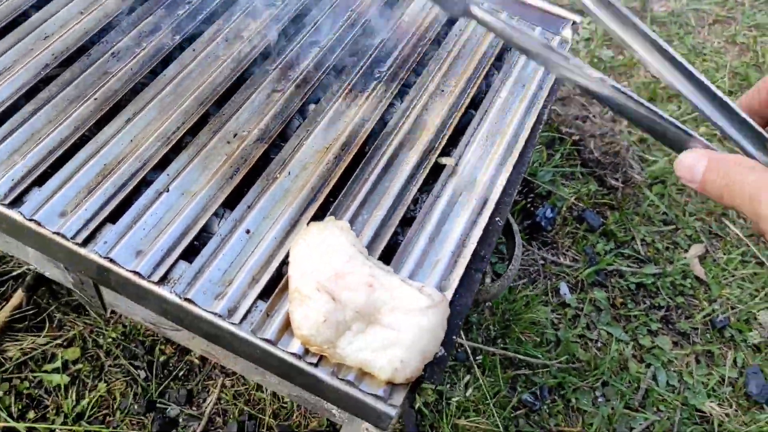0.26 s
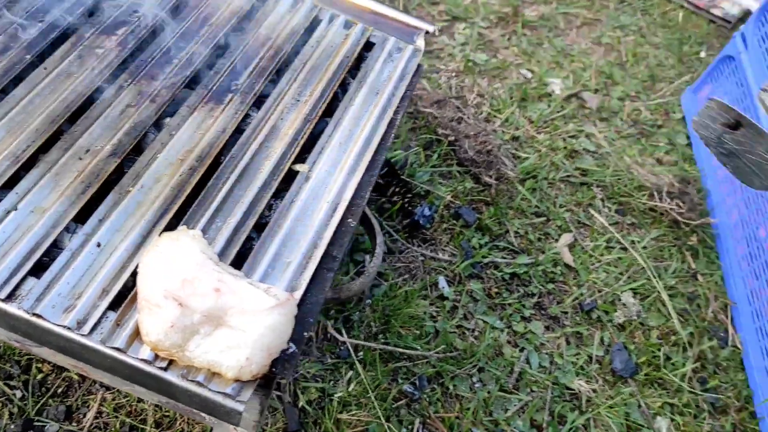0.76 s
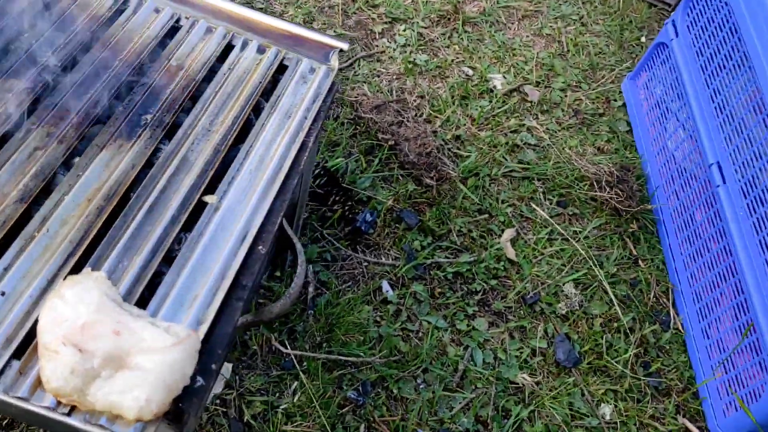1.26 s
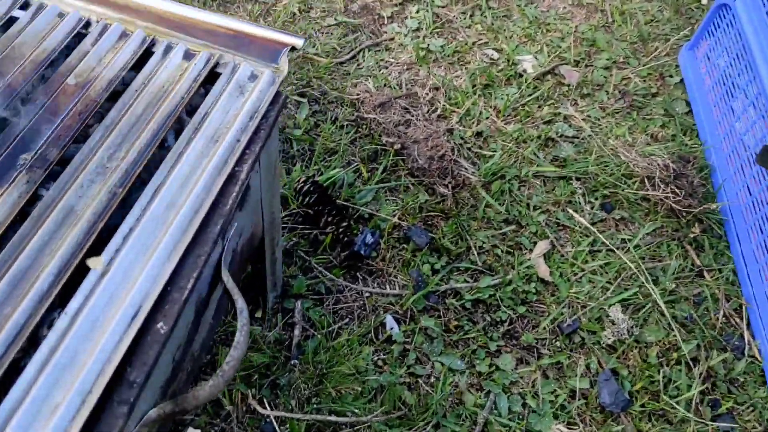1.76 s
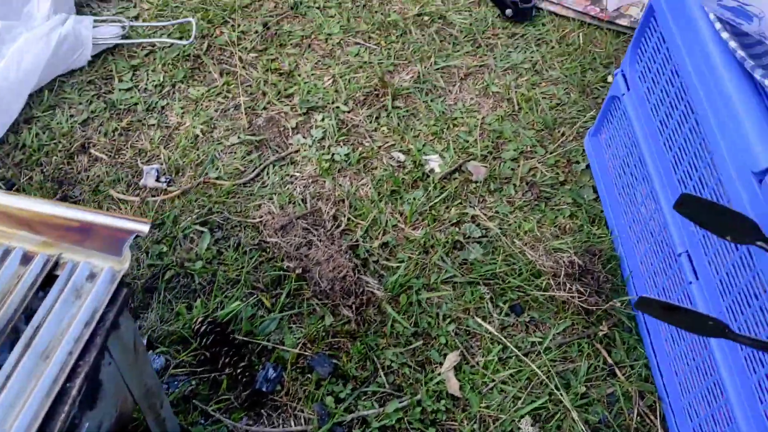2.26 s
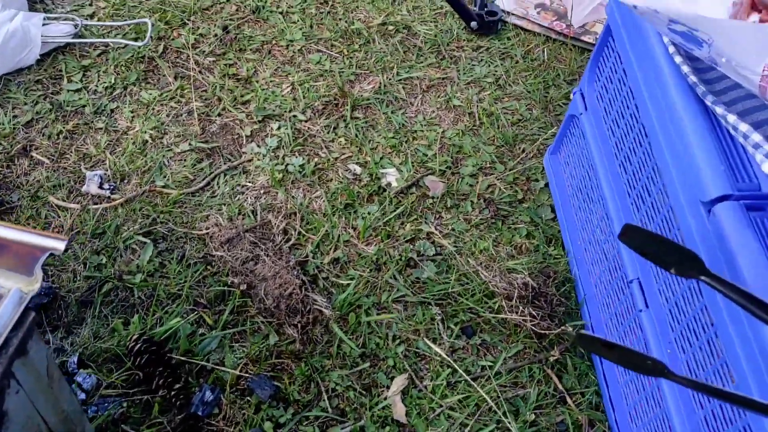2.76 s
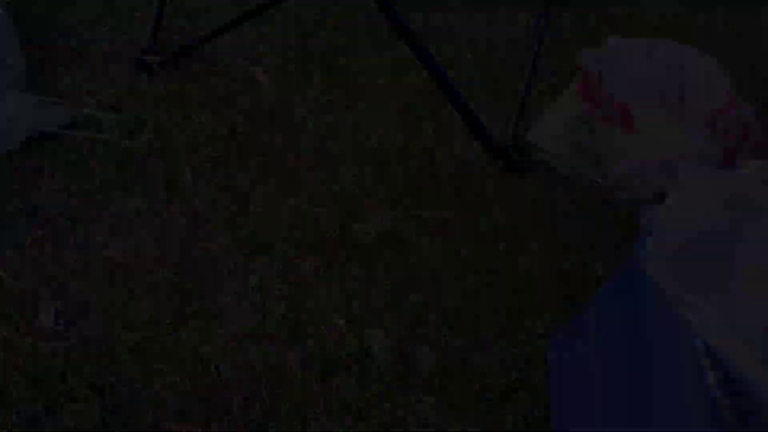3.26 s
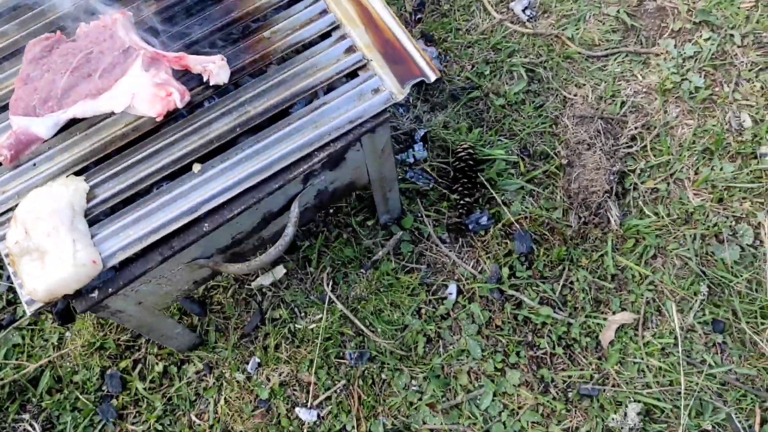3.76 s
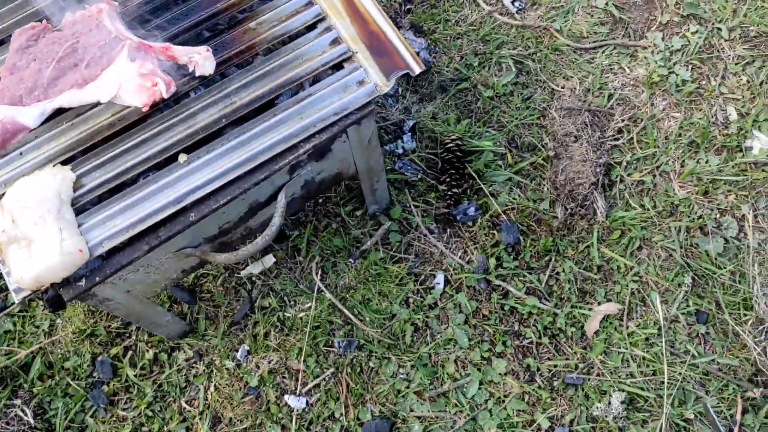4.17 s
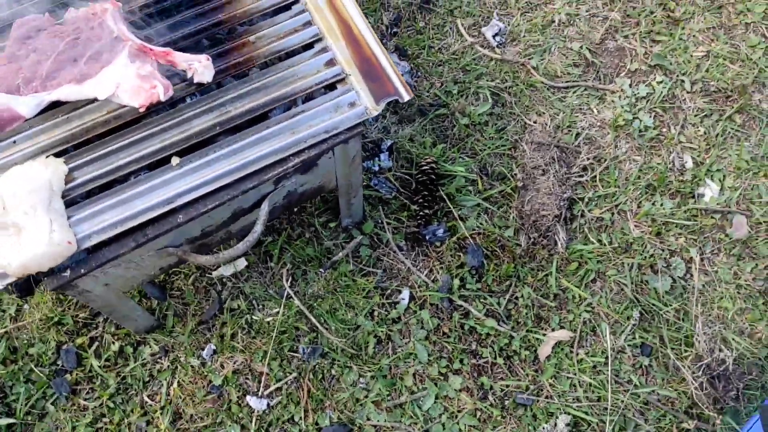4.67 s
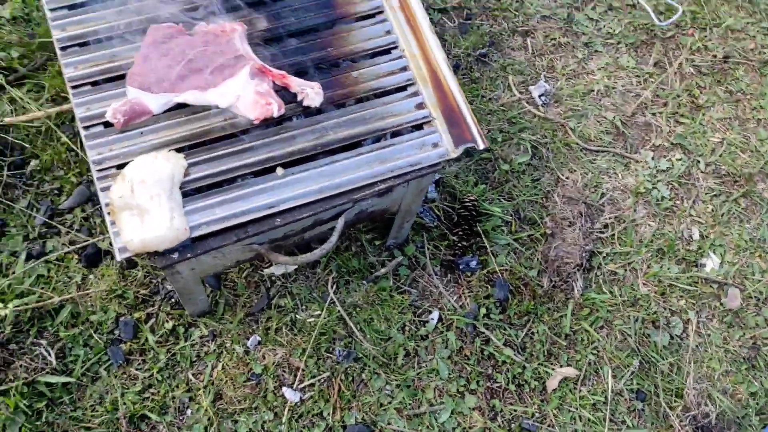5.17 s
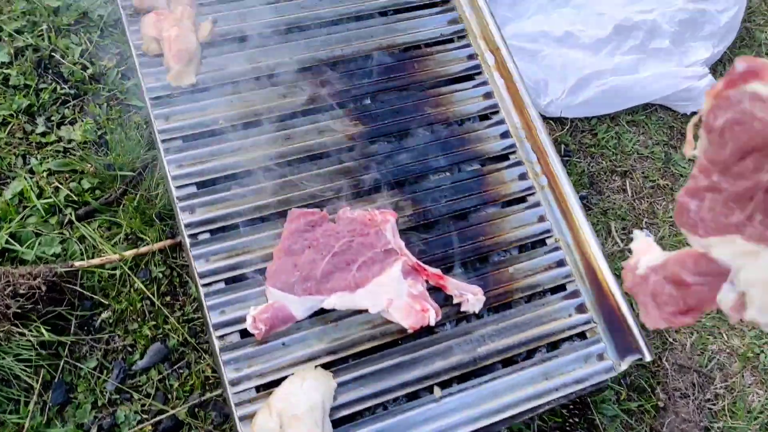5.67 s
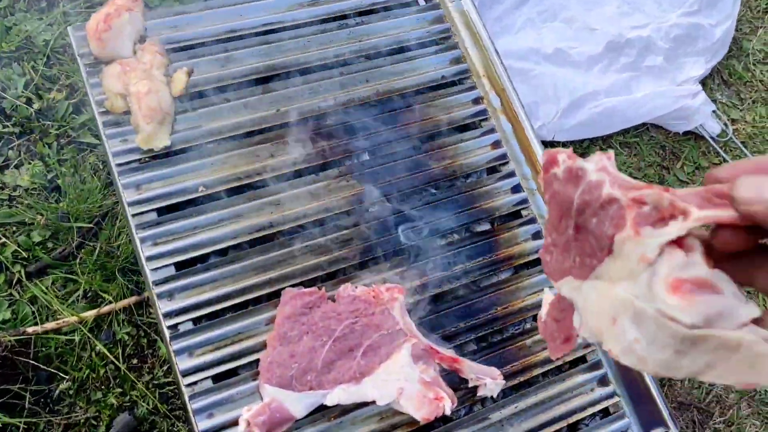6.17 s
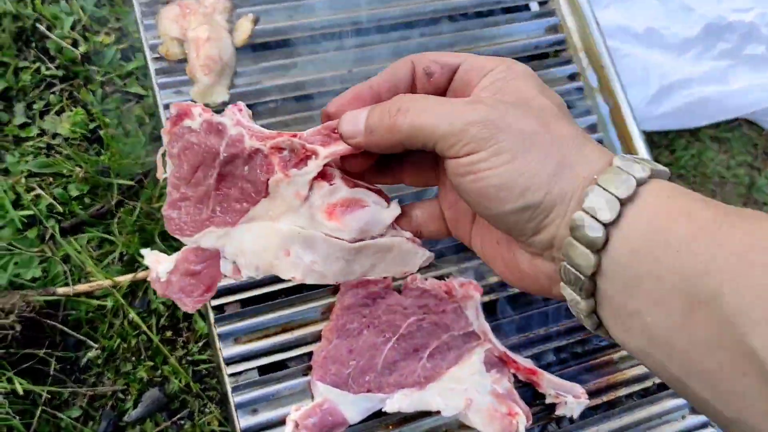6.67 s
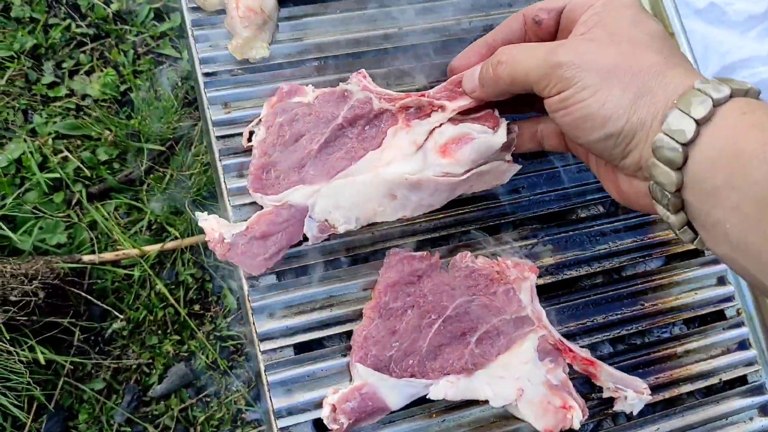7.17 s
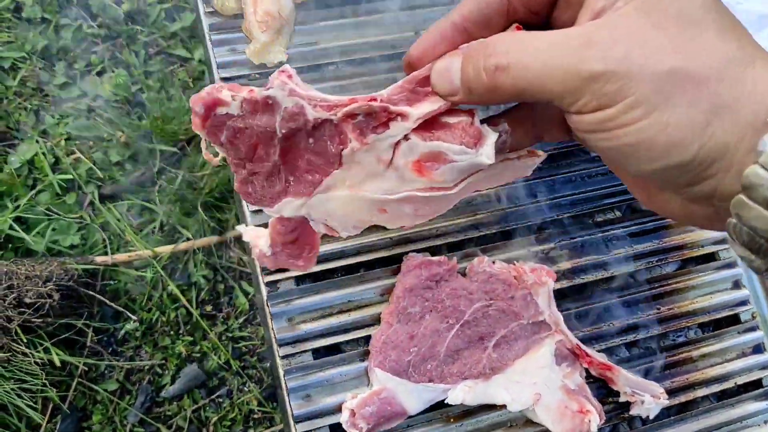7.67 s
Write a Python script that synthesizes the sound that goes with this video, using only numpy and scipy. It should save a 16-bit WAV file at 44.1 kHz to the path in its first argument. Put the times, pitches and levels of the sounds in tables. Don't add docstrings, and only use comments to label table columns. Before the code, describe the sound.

Outdoors, metal tongs strike loose grill bars twice with a bright, short ring. A faint distant fat hiss swells briefly, then the tongs knock a hollow plastic crate. After a tiny dropout the sound jumps to meat close up: loud, surging sizzle with steamy hiss, snapping bubbles and clicking droplets. Light wind buffets the handheld stereo microphones and fingers bump the camera body.

```python
import sys
import numpy as np
from scipy import signal
from scipy.io import wavfile
from scipy.ndimage import uniform_filter1d

SR = 44100
rng = np.random.default_rng(int(sys.argv[2]) if len(sys.argv) > 2 else 0)


def how_loud(loudness_db):
    steps = np.asarray(loudness_db, float) / 20
    return 10 ** steps


def persist_wave(psi):
    counts = np.round(np.clip(psi, -1, 1) * 32767).astype(np.int16)
    wavfile.write(sys.argv[1], SR, np.atleast_2d(counts).T)


N = 349713


def evened(x):
    return x / np.sqrt(np.mean(np.abs(x) ** 2) + 1e-20)


def read(points, hz):
    f, value = np.transpose(points)
    return np.interp(np.log(hz + 1), np.log(f + 1), value)


def curves(rows, t):
    s, *columns = np.transpose(rows)
    return [np.interp(t, s, c) for c in columns]


def sides(pan_db):
    return how_loud(np.array([pan_db, -pan_db]) / 2)


def steady_sides(pan_db):
    gains = sides(pan_db)
    return gains / np.sqrt((gains ** 2).mean(0))


def add(mix, s, sound):
    part = mix[:, round(s * SR):][:, :sound.shape[1]]
    part += sound[:, :part.shape[1]]


def butter(x, hz, kind="low", order=2):
    return signal.lfilter(*signal.butter(order, hz, kind, fs=SR), x)


def coloured(x, points):
    gain = np.log(how_loud(read(points, np.abs(np.fft.fftfreq(4096, 1 / SR)))))
    taps = np.fft.ifft(np.exp(gain - 1j * signal.hilbert(gain).imag)).real[:2048]
    return signal.oaconvolve(x, taps[None], axes=1)[:, :x.shape[1]]


def wander(hz):
    return evened(butter(rng.standard_normal(N), hz))


# f/Hz, level/dB
PORT_LEFT = [(600, -32.5), (1500, -25), (6000, -14), (7400, -6.5), (8600, 4.5), (9800, -10.5),
             (11500, -32.5), (15300, -33.5)]
PORT_RIGHT = [(1450, -31.5), (2400, -14.5), (5000, -13), (6200, -8), (7200, 12), (9300, -2.5),
              (11500, -28.5), (15300, -25.5)]


def through_ports(x):
    return np.vstack([coloured(x[:1], PORT_LEFT), coloured(x[1:], PORT_RIGHT)])


# t/s, level/dB, left-right/dB
WIND = [(0.0, -56, -6), (0.72, -60.5, 9.5), (3.04, -62.5, 4.5), (3.56, -55, 14), (5.18, -49, 20),
        (5.78, -61.5, 7), (6.98, -55, 13), (7.44, -66, 17)]
# f/Hz, level/dB
WIND_COLOUR = [(10, 2.5), (40, -3.5), (90, -21), (200, -22), (400, -25), (800, -69)]
# t/s, level/dB
YARD = [(0.0, -63.5), (0.29, -51), (0.5, -63.5), (1.52, -56.5), (1.77, -62), (2.72, -68.5), (3.6, -57.5),
        (3.97, -56), (4.4, -71.5), (5.3, -55.5), (5.85, -62), (7.93, -71)]
# f/Hz, level/dB
YARD_COLOUR = [(60, -33), (130, -17.5), (280, -2.5), (350, -7.5), (600, -13), (1300, -19.5), (2500, -29.5),
               (4000, -61)]


def air():
    t = np.arange(N) / SR
    db, pan_db = curves(WIND, t)
    gust = evened(coloured(rng.standard_normal((2, N)), WIND_COLOUR)) * how_loud(2.3 * wander(11.4))
    far = rng.standard_normal((3, N))
    wash = evened(coloured(far[:1] + 0.5 * far[1:], YARD_COLOUR))
    wash_db = curves(YARD, t)[0] + 0.45 * wander(1.5)
    return how_loud(db + 3.0) * steady_sides(pan_db) * gust + how_loud(wash_db) * wash


# t/s, pose index
POSE = [(0, 0), (1.9, 0), (2.3, 1), (3.33, 1), (3.36, 2), (5.3, 2), (5.6, 3), (5.85, 3), (6, 4), (8, 4)]
# t/s, level/dB
HEAT = [(0, -5), (0.9, -3.5), (1.15, 7), (1.5, 10), (1.7, 3), (2.15, 2), (2.5, -9), (3, -4), (3.2, 5),
        (3.33, 6), (3.36, -16.5), (3.46, -9.5), (3.58, 2), (8, 0)]
# peak t/s, level over simmer/dB, half length/s
SURGES = [(1.266, 2, .05), (3.685, 6, .07), (3.898, 7.5, 0.081), (4.13, 4, 0.13), (4.486, 7.5, 0.047),
          (4.663, 6, 0.12), (5.141, 8, 0.06), (5.346, 7, 0.053), (5.56, 3, 0.034), (5.702, 3.5, 0.071),
          (5.853, -4.5, 0.054), (6.088, 5.5, 0.07), (6.29, 4, 0.078), (6.426, 6.5, 0.071),
          (6.956, 10.5, 0.073), (7.068, 10, 0.052), (7.227, 8.5, 0.1), (7.433, 7, 0.085),
          (7.593, 7.5, 0.059), (7.89, 7.5, 0.17)]
# level/dB of spit, steam, fizz
POSE_DB = [(-62, -56.5, -74), (-62, -55, -75), (-42, -29, -49), (-42, -29, -45), (-41, -29, -41.5)]
# left-right/dB of spit, steam, fizz
POSE_PAN_DB = [(0, -4, -4), (-4.5, -9, 0), (-8, -4.5, 0), (-5.5, 3, -4), (-7, 4, -9)]


def boil(t):
    pose = curves(POSE, t)[0]
    s, db, half_s = np.transpose(SURGES)[:, :, None]
    surge_db = (db * np.exp(-((t - s) / half_s) ** 2)).sum(0)
    far = np.array([1.01, 0.32, 0.41])[:, None]
    near = np.array([0.93, 0.95, 0.78])[:, None]
    moved_db = np.where(t < GAPS[0][1], far, near) * curves(HEAT, t)[0] + near * surge_db

    def posed(rows):
        return np.array([np.interp(pose, range(len(rows)), c) for c in np.transpose(rows)])

    return posed(POSE_DB) + moved_db, posed(POSE_PAN_DB)


def crackle(per_s, spread_db, burst_s):
    size_db = spread_db * np.minimum(rng.exponential(1, N), 4.5)
    size = how_loud(size_db) * (rng.random(N) < per_s / SR)
    puff = np.exp(-np.arange(300) / (burst_s * SR))
    return evened(np.sqrt(np.abs(signal.oaconvolve(size ** 2, puff ** 2)[:N])))


# low f/Hz, high f/Hz
BANDS = [
    (1500, 5000),
    (5500, 10000),
    (11000, 15500),
]
# shared bubbles, own bubbles, smooth hiss (gains), rate/(1/s), burst/s, size spread/dB
LAYERS = [
    (0.28, 1, 1.05, 1200, 0.0013, 1),
    (0.3, 0.33, 1.1, 2000, 0.00029, -6.5),
    (0.46, .4, 1.1, 3300, .0004, 14),
]
CROSSINGS_HZ = [4830, 6870, 10420, 11630]
# f/Hz, lead/rad
LEADS = [
    [(0, -17.5), (1500, 9.5), (3000, -9.5), (4000, 19.5), (4600, 13.5), (6500, 8.5)],
    [(0, -2), (2200, -1.5), (4500, -4.5), (7000, -8.5), (16000, -14)],
    [(430, .6), (1000, 3.1), (1750, 3.2), (2400, 2.3), (4300, 0), (5600, -3.2), (16000, -23)],
    [(0, 12), (600, 2), (1300, -1.3), (4200, -3), (5200, -1.5), (9000, -3), (12000, -24.5)],
]
# f/Hz, coherence 0-1
ALIKE = [(300, 0.3), (950, 0.83), (1750, 0.72), (2300, 0.24), (4500, 0.34), (15000, 0.11)]
HZ, FRAMES = np.fft.rfftfreq(512, 1 / SR), N // 128 + 2


def sizzle():
    t = np.arange(FRAMES) * 128 / SR
    near = np.where(np.arange(N) < GAPS[0][1] * SR, 0.25, 1)
    common, clumps = crackle(500, 5, 0.0012), 0.42 * wander(32)
    place = np.minimum(curves(POSE, t)[0], len(LEADS) - 1)
    lead = 0
    for k, points in enumerate(LEADS):
        weight = np.clip(1 - abs(place - k), 0, 1)
        lead = lead + np.exp(1j * np.interp(HZ, *np.transpose(points)))[:, None] * weight
    lead = lead / (abs(lead) + 1e-9)
    alike = np.clip(read(ALIKE, HZ), 0, 1)[:, None]
    ports = how_loud(np.array([read(PORT_LEFT, HZ), read(PORT_RIGHT, HZ)]))[:, :, None]
    patches = uniform_filter1d(rng.standard_normal((FRAMES, len(HZ))), size=14, axis=0)
    patches = evened(uniform_filter1d(patches, size=7, axis=1)).T
    out = 0
    for k, ((lo, hi), db, pan_db) in enumerate(zip(BANDS, *boil(t))):
        shared, own, smooth, per_s, burst_s, spread_db = LAYERS[k]
        bursts = shared * common + own * crackle(per_s, spread_db, burst_s)
        shape = (near * bursts + smooth) * how_loud(near * (clumps + 1.64 * wander(25)))
        shape /= np.sqrt(uniform_filter1d(shape ** 2, size=6000))
        noise = shape * rng.standard_normal((2, N))
        a, b = signal.stft(noise, nperseg=512, noverlap=384)[2][:, :, :FRAMES]
        right = alike * a / (lead + 1e-9) + np.sqrt(1 - alike ** 2) * b
        share = np.interp(HZ, CROSSINGS_HZ, [k == 0, k == 1, k == 1, k == 2])
        z = ports * np.sqrt(share)[:, None] * np.array([a, right])
        power = 4 / 3 * (abs(z[:, (HZ > lo) & (HZ < hi)]) ** 2).sum(1).mean(1)
        out = out + z * (how_loud(db) * steady_sides(pan_db) / np.sqrt(power)[:, None])[:, None]
    duller_db = np.outer(np.interp(HZ, [500, 1200, 3000], [7, 6, 0]), t < GAPS[1][0])
    return signal.istft(out * how_loud(2.5 * patches + duller_db), nperseg=512, noverlap=384)[1][:, :N]


def ring(modes, t, spread_db):
    hz, db, t60 = np.transpose(modes)[:, :, None]
    turn, slip, pan = rng.standard_normal((len(hz), 3)).T[:, :, None]
    apart = np.clip(slip, -1, 1) * np.minimum(hz / 9000, 0.15)
    cycles = hz * t + turn + np.array([apart, -apart])
    waves = how_loud(db - 60 * t / t60) * np.sin(2 * np.pi * cycles)
    return (waves * sides(spread_db * np.clip(pan, -1.5, 1.5))).sum(1)


# t/s, peak level/dB, clatter t60/s
TONGS = [
    (0.111, -5, 0.15),
    (0.127, -16.5, 0.047),
    (0.257, -4, 0.14),
    (0.29, -18.5, 0.064),
]
# f/Hz, level/dB
CLATTER = [(88, -52), (150, -15.5), (2310, -9.5), (3040, -20.5), (4060, -13), (5230, -10.5), (8490, -2),
           (15500, -36)]
# f/Hz, level/dB, t60/s
STEEL_A = [(266, -24.5, 0.51), (401, -14.5, 0.24), (570, -25, 0.31), (2300, 7.5, .04), (3919, -16, .17),
           (5130, -19, .6), (9900, -25, .5), (12700, -25, .22), (6940, -9, 0.17), (7600, 4, 0.15),
           (7240, -3, 0.05), (8500, 1, .083), (8870, 7, 0.065), (10620, -19, .065)]
# f/Hz, level/dB, t60/s
STEEL_B = [(258, -30, 0.98), (400, -17, 0.16), (2190, -12, .04), (6724, -8, .1), (8355, 0, 0.084),
           (3919, -27, 0.25), (5130, -25, 0.6), (12800, -22, .15)]


def tongs():
    out, t = np.zeros((2, N)), np.arange(SR // 2) / SR
    for s, db, t60 in TONGS:
        clatter = coloured(rng.standard_normal((2, len(t))), CLATTER)
        shape = 0.5 * how_loud(-60 * t / 0.043) + 0.16 * how_loud(-60 * t / t60)
        add(out, s, how_loud(db) * evened(clatter) * shape * np.minimum(t / 0.00062, 1))
    add(out, TONGS[0][0], how_loud(-19.5) * ring(STEEL_A, t, 1.4) * np.minimum(t / 0.0031, 1))
    add(out, TONGS[2][0], how_loud(-13.0) * ring(STEEL_B, t, 7) * np.minimum(t / 0.0051, 1))
    return out


# t/s, peak level/dB, spit re peak/dB, left-right/dB
TICKS = [
    (0.5048, -44, -28, -23),
    (1.025, -44, 9, -11),
    (1.7695, -30.5, -8, -9),
    (2.388, -38, -31, -18),
    (2.9, -42.5, 8, -14.5),
    (3.2098, -30, -14, -1),
]
# t/s, peak level/dB, left-right/dB, length/s
SNAPS = [(4.105, -7, -9.2, 0.0031), (4.159, -8.5, -17, 0.0012), (4.1644, -6.5, -16, 0.0011),
         (4.493, -15, -11, 0.0015), (5.0896, -9, -11, 0.0016), (5.4546, -15, -17, 0.0066),
         (5.5657, -5.5, 15.5, 0.0012), (5.574, -5, -1.5, 0.0016), (5.66, -5.5, 17, 0.003),
         (5.6696, -6.5, 14, 0.0025), (5.77, -7, 2, 0.003), (6.4, -9.5, -6, 0.0069),
         (6.4806, -6, -5, 0.0019), (6.491, -3, 16.5, 0.00096), (7.256, -0.5, 11, 0.0003),
         (7.2835, 3, 8, 0.00057), (7.377, -0.5, -5, 0.00054), (7.727, -9, -15, 0.00071)]
# t/s, peak level/dB, left-right/dB, length/s
SPITS = [(3.652, -2.5, -6, 0.0023), (3.6656, -13, -11, 0.0045), (3.843, -13, 5, 0.0027),
         (5.19, -17, 8, 0.00052), (5.504, -7.5, 4, 0.00056), (5.7903, -2.5, 3, 0.001),
         (5.951, -2.5, 1, 0.00044), (6.0552, -4, 5, 0.0008), (6.116, -12, -3, 0.002),
         (7.4383, -7.5, 4, 0.0057), (7.4574, -10, -18, 0.0014), (7.606, -1.5, -3, 0.0012),
         (7.819, -4, -14, 0.00057)]


def pops():
    out, t = np.zeros((2, N)), np.arange(1200) / SR
    tick_s, dry_spit_db, wet_spit_db = 0.0013, -39.5, -12
    bursts = [(*row, tick_s) for row in TICKS]
    bursts += [(s, db, dry_spit_db, pan_db, length) for s, db, pan_db, length in SNAPS]
    bursts += [(s, db, wet_spit_db, pan_db, length) for s, db, pan_db, length in SPITS]
    for s, db, spit_db, pan_db, length in bursts:
        rise = 0.6 * length
        fall = np.exp(-(np.maximum(t - rise, 0) / (1.63 * length + 0.00021)) ** 1.22)
        shape = np.where(t < rise, (t / rise) ** 2, fall)
        puff = rng.standard_normal((2, len(t))) * shape
        spit = butter(puff, [1100, 8000], "band")
        spit /= np.linalg.norm(spit, axis=1)[:, None]
        bright = butter(through_ports(puff), 5500, "high")
        bright /= np.linalg.norm(bright, axis=1)[:, None]
        size = np.linalg.norm(shape)
        sound = 0.5 * size * (bright + 0.6 * how_loud(spit_db) * spit)
        add(out, s - rise - 0.0004, how_loud(db) * sides(pan_db)[:, None] * sound)
    return out


# centre t/s, peak level/dB, f/Hz, length/s
EDDIES = [(0.625, -44.5, 42.4, .05), (0.906, -38, 39.3, .03), (0.98, -40, 50.4, 0.017),
          (1.043, -42, 62.3, 0.022), (3.563, -28.5, 58, 0.021), (3.878, -29, 37.4, 0.023),
          (4.02, -42.5, 88, .03), (4.268, -37.5, 49.4, 0.061), (4.393, -37.5, 50, .03),
          (4.648, -36.5, 51, 0.042), (4.801, -32.5, 54.3, 0.042), (4.924, -30, 58.7, 0.033),
          (5.057, -20, 83.5, 0.015), (5.301, -39, 50.7, 0.077), (5.396, -30.5, 71.4, 0.02),
          (5.443, -29.5, 69.4, 0.014), (6.34, -40, 68.4, 0.061), (6.915, -38, 49.3, 0.027),
          (6.984, -36, 61, 0.031)]


def eddies():
    out = np.zeros((2, N))
    for s, db, hz, length in EDDIES:
        t = np.arange(-2 * length, 2 * length, 1 / SR)
        rough = evened(butter(rng.standard_normal(len(t)), 1.8 * hz))
        bend = 1 + 0.073 * np.cos(np.pi * t / length / 4)
        cycles = 0.66 * np.cos(2 * np.pi * hz * t * bend)
        swell = np.exp(-(t / length) ** 2 * 1.7) * (cycles + 0.5 * rough)
        add(out, s - 2 * length, how_loud(db) * how_loud(np.array([[0], [-22]])) * swell)
    return out


# centre t/s, level/dB, half length/s
DRAUGHTS = [
    (0.82, -57.5, 0.12),
    (1.116, -72, 0.066),
    (1.53, -60, 0.21),
]


def draught():
    s, db, half_s = np.transpose(DRAUGHTS)[:, :, None]
    swell = (how_loud(db) * np.exp(-((np.arange(N) / SR - s) / half_s) ** 4)).sum(0)
    murmur = evened(butter(rng.standard_normal(N), [235, 350], "band"))
    return swell * how_loud(2.1 * wander(20)) * murmur


# t/s, peak level/dB, f/Hz, left-right/dB
THUDS = [(1.888, -50.5, 488, 8.5), (3.465, -46, 198, -5), (3.65, -47, 320, 10), (3.763, -39.5, 388, 9),
         (3.787, -34, 417, 11), (3.874, -38.5, 790, 13), (4.016, -35, 276, 8), (4.114, -35.5, 430, 6),
         (4.209, -38.5, 280, 9), (4.241, -46, 750, 16), (4.428, -38.5, 332, 7), (4.478, -36, 237, 7),
         (4.693, -33, 255, 10), (6.16, -31, 436, 8.5), (6.674, -41, 423, -7), (7.485, -38, 348, -25),
         (7.603, -44, 314, 3)]
# t/s, level/dB, settling/s, sign
BUMPS = [
    (3.468, -25.5, 1, 0.67),
    (7.461, -6, 0.062, -0.81),
]


def handling():
    out, t = np.zeros((2, N)), np.arange(SR // 2) / SR
    decay = how_loud(-60 * t / 0.038) + 0.11 * how_loud(-60 * t / 0.18)
    for s, db, hz, pan_db in THUDS:
        grit = butter(rng.standard_normal(len(t)), [0.37 * hz, 2.56 * hz], "band")
        glide_s = 0.00044 * (1 - np.exp(-t / 0.0016))
        body = 0.91 * np.sin(2 * np.pi * hz * (t + glide_s))
        thud = (body + 3.35 * grit) * np.minimum(t / 0.0021, 1) * decay
        add(out, s, how_loud(db) * sides(pan_db)[:, None] * thud)
    for s, db, settle_s, sign in BUMPS:
        step = sign * (1 - t / settle_s) * np.exp(-t / settle_s) * (1 - 3.7 * np.exp(-t / 0.00064))
        add(out[1:], s, how_loud(db) * step[None] * np.minimum(t / 0.0001, 1))
    return out


# t/s, peak level/dB, wall boom re peak/dB
KNOCKS = [
    (2.01, -7, -22),
    (2.015, -5, -14),
    (2.181, -27.5, -2.5),
    (2.194, -20.5, -1.5),
]
# f/Hz, level/dB, t60/s
CRATE = [(313, -18, 0.041), (756, -4, 0.012), (888, -11, 0.022), (1125, 1, 0.028), (1085, -30, 0.12),
         (1294, -5, 0.029), (2116, -1, 0.02), (2380, -14.5, 0.025), (2667, 3.5, 0.0097)]
# f/Hz, level/dB, t60/s
WALL = [(327, -1, 0.031), (480, -12, 0.039), (210, -4.5, .04), (605, -9.5, 0.045)]


def crate():
    out, t = np.zeros((2, N)), np.arange(SR // 5) / SR
    for s, db, boom_db in KNOCKS:
        tick = through_ports(rng.standard_normal((2, len(t))) * how_loud(-60 * t / 0.018))
        rattle = butter(rng.standard_normal((2, len(t))), [300, 3000], "band")
        rattle *= 0.93 * how_loud(-60 * t / 0.021) + 0.08 * how_loud(-60 * t / 0.056)
        panel = 0.53 * ring(CRATE, t, 2.2)
        boom = how_loud(boom_db) * ring(WALL, t, 2.1)
        add(out, s, how_loud(db) * (panel + rattle + 0.45 * tick + boom) * np.minimum(t / 0.002, 1))
    return butter(out, 190, "high")


def spatter():
    t = np.arange(N) / SR
    frame_s = np.arange(FRAMES) * 128 / SR
    steam_db = np.interp(t, frame_s, boil(frame_s)[0][1])
    size = how_loud(5.6 * np.minimum(rng.exponential(1, N), 3.5)) * rng.choice([-1, 1], N)
    size *= rng.random(N) < 130 / SR
    clicks = through_ports(size * sides(2.6 * rng.standard_normal(N)))
    clicks = evened(butter(clicks, 2600, "high", 4))
    return how_loud(steam_db - 9.5) * clicks * (t > GAPS[1][1])


def scene():
    fat = sizzle() + pops() + spatter()
    blows = tongs() + crate()
    return air() + fat + blows + eddies() + draught() + handling()


# start t/s, end t/s
GAPS = [
    (3.335, 3.352),
    (3.399, 3.432),
]


def roll_off(x):
    return signal.sosfilt(signal.butter(12, 16820, fs=SR, output="sos"), x)


def record(dry):
    t = np.arange(N) / SR
    overloaded = np.tanh(1.001 * dry) / 1.187
    lowpass = signal.firwin(255, 15500, window=("kaiser", 7), fs=SR)
    band = signal.oaconvolve(overloaded, lowpass[None], "same")
    is_open = np.prod([np.clip(np.maximum(a - t, t - b) / 0.00066, 0, 1) for a, b in GAPS], axis=0)
    return roll_off(band * is_open)


dry = scene()
out = record(dry)
persist_wave(out)
```